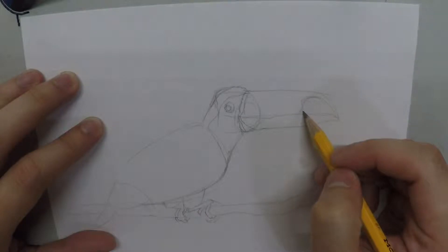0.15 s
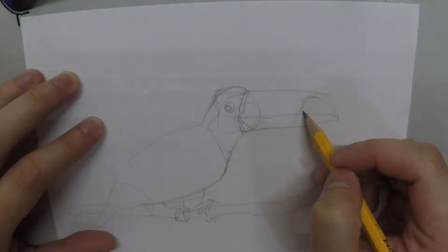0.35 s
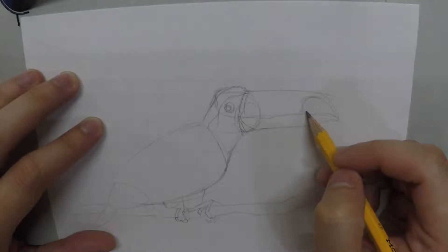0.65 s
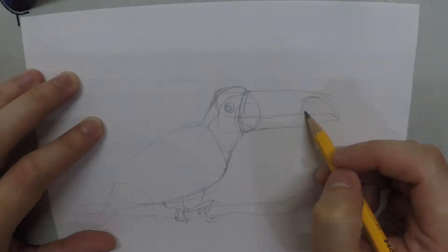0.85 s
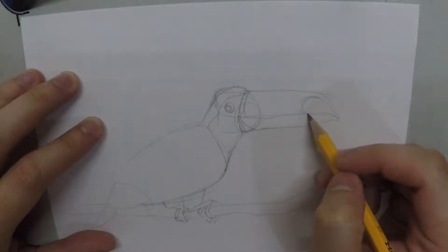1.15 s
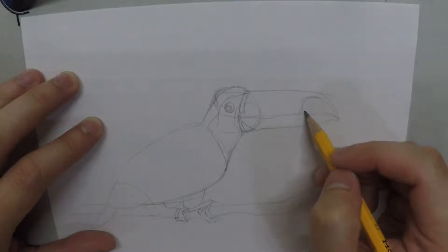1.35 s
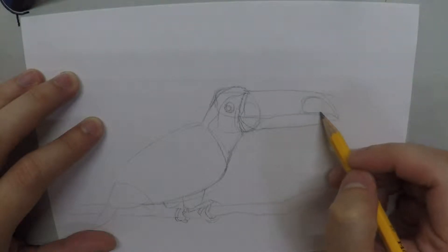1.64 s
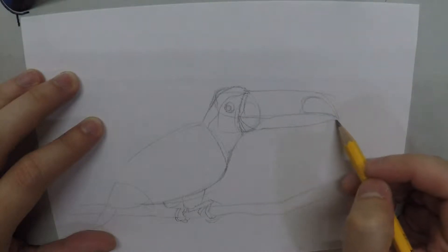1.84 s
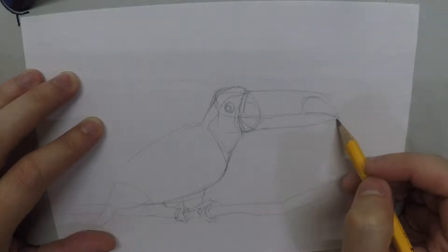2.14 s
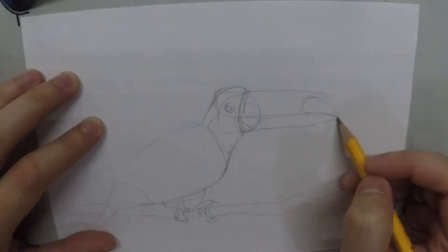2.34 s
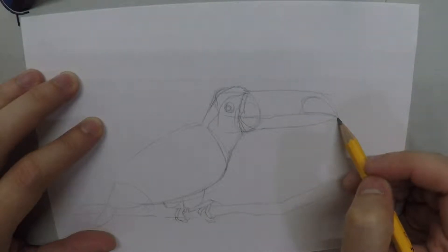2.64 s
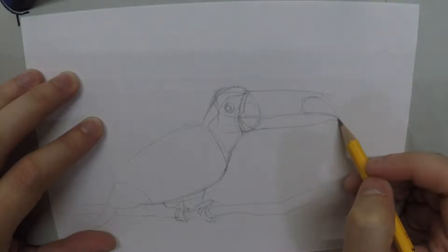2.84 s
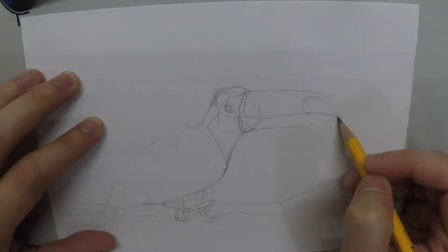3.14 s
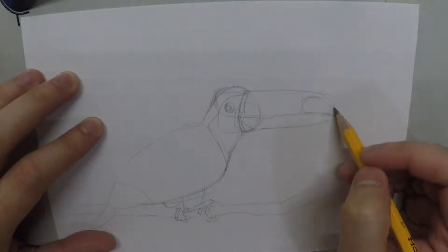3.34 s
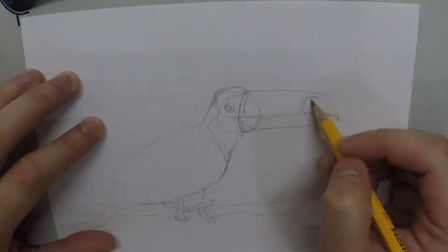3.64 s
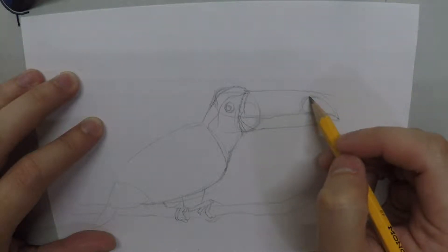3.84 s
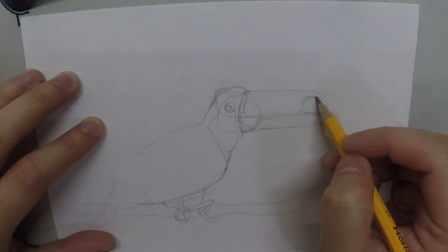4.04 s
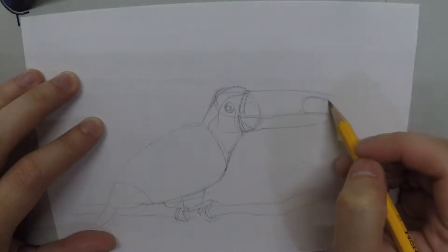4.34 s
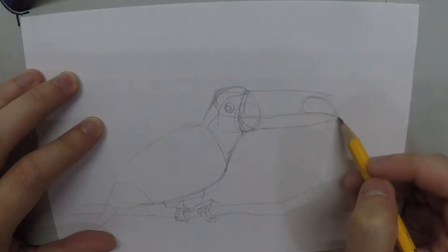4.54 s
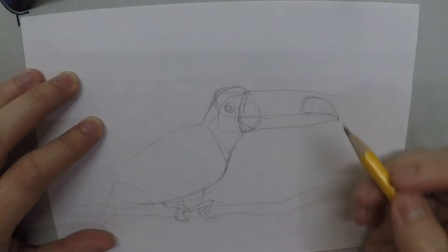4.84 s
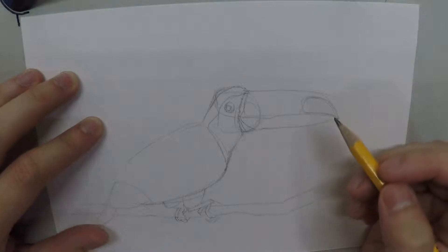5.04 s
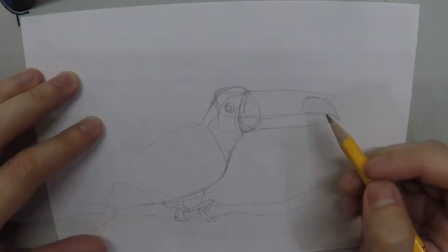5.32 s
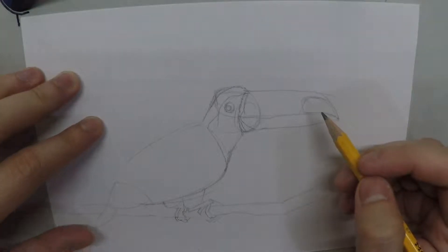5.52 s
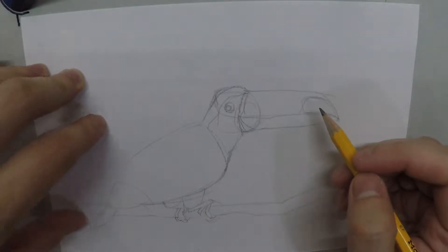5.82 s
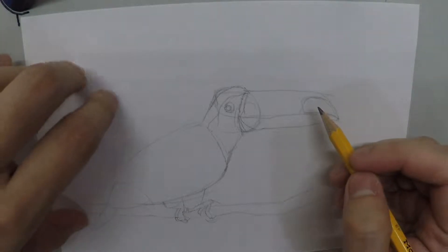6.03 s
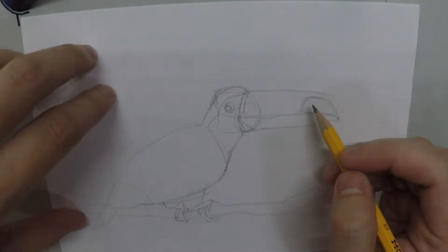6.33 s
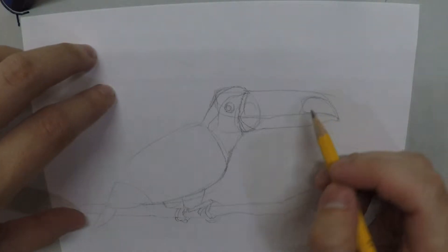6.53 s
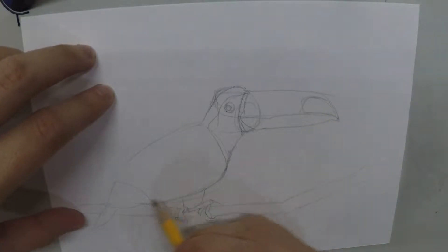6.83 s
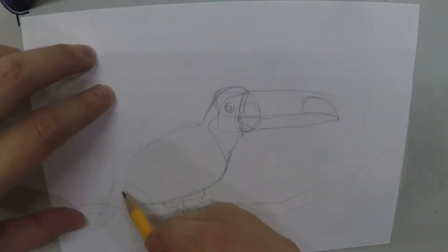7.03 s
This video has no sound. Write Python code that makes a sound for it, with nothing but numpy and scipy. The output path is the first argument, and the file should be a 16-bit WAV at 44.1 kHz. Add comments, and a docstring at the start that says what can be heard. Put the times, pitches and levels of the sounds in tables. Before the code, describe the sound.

A close microphone at a desk in a small, quiet room, with faint hiss and low rumble. From 0 to 1.4 s there is almost nothing, just tiny skin grazes on paper. A soft hand slide begins at 1.4 s, and a lighter pencil stroke starts at 1.5 s. Until about 3.85 s, short dry scratches follow, spaced roughly 0.15 to 0.3 s, bright and gritty, strongest from 2.2 s; a few carry a thin high squeak, notably at 2.2 and 2.6 s. A pause holds a faint hand slide near 4.2 s. Four more crisp strokes come at 4.6, 4.7, 4.9 and 5.2 s. Deep soft double thump of the hand on the desk at 4.9 s, another thump at 5.3 s, both with a short low ring. Afterwards only barely audible pencil touches around 5.5 to 5.8 s, light fingertip taps near 6 s, a very faint bump at 6.55 s, and a slight skin graze at 6.9 s.

```python
"""Pencil sketching at a desk

A pencil makes quick strokes on paper lying on a desk in a small quiet room: slip noise rings pencil and sheet.
At each stroke's top speed a short tone with unsteady pitch makes a squeak, mostly weaker than the scratch.
The drawing hand thumps softly on ringing desk modes and slides over the sheet as filtered friction noise.
Skin grazes and fingertip taps ring the paper; a low rumble, a faint noise floor and room echoes surround it."""
import sys
import numpy as np
from scipy import signal
from scipy.fft import rfft, irfft
from scipy.io import wavfile

SR = 44100
rng = np.random.default_rng(int(sys.argv[2]) if len(sys.argv) > 2 else 0)


def file_out(sig):
    """Save sig as 16-bit WAV at sys.argv[1]."""
    # one column per channel
    cols = np.atleast_2d(sig).T
    # limit, then scale
    lim = np.clip(cols, -1, 1)
    pcm = np.round(lim * 32767).astype(np.int16)
    wavfile.write(sys.argv[1], SR, pcm)


N = 316446
TIME = np.arange(N) / SR


def from_db(db):
    """Decibels to amplitude gain."""
    return 10 ** (np.asarray(db) / 20)


def rms_one(x):
    """Scale to rms 1."""
    return x / np.sqrt(np.mean(x ** 2) + 1e-20)


def at_hz(points, hz):
    """Read a table on a log-frequency axis."""
    f, value = np.transpose(points)
    return np.interp(np.log(np.maximum(hz, 1)), np.log(f), value)


def add(track, start_s, sound):
    """Mix a sound into the track from start_s, cut at the track's end."""
    i = round(start_s * SR)
    track[i:i + len(sound)] += sound[:N - i]


def band(x, low_hz, high_hz):
    """Butterworth band-pass."""
    edges = [low_hz, min(high_hz, .45 * SR)]
    return signal.sosfilt(signal.butter(2, edges, "band", fs=SR, output="sos"), x)


def resonate(x, hz, width_hz):
    """A resonance passed twice, so that its skirts are steep; width_hz is that of one pass."""
    r = np.exp(-np.pi * width_hz / SR)  # pole radius
    section = [(1 - r * r) / 2, 0, -(1 - r * r) / 2, 1, -2 * r * np.cos(2 * np.pi * hz / SR), r * r]
    return signal.sosfilt([section, section], x + 1e-18)


def rub(force, hz, width_hz):
    """Friction noise under a force rings one resonance; a steady force of 1 gives about rms 1."""
    noise = force * rng.standard_normal(len(force))
    return resonate(noise, hz, width_hz) * np.sqrt(2 * SR / (np.pi * width_hz))


def wobble(size, rate_hz):
    """Random points at rate_hz joined by straight lines, rms 1."""
    return rms_one(np.interp(np.arange(size) * rate_hz / SR, np.arange(size), rng.standard_normal(size)))


def coloured_noise(spectrum):
    """Steady noise of a given colour, rms 1."""
    gain = from_db(at_hz(spectrum, np.arange(N // 2 + 1) * SR / N))
    return rms_one(irfft(rfft(rng.standard_normal(N)) * gain, N))


# colour of the noise floor, relative density: hz, density_db (per Hz)
QUIET_COLOUR = [(26, -28.5), (45, -7.5), (77, -2), (98, -15), (131, -11), (218, -24.5), (307, -25.5),
                (411, -27), (873, -32), (1090, -29), (1450, -33.5), (2940, -32), (3750, -31.5), (4040, -34),
                (15000, -45.5)]


def background(level_db=-62.5):
    """Room tone and microphone hiss, levelled by its rms from 200 to 15000 Hz."""
    lowest_point = (20, QUIET_COLOUR[0][1] - 10)
    noise = coloured_noise([lowest_point] + list(QUIET_COLOUR))
    return from_db(level_db) * noise / np.std(band(noise, 200, 15000))


# the resting hands stir the desk, before the trim: time_s, level_db
RUMBLE_LEVEL = [(0, -53.5), (.8, -54), (1.05, -48), (1.5, -50.5), (2.5, -47), (3.2, -46.5), (3.75, -58.5),
                (4.17, -43), (4.4, -52), (4.8, -42), (5.8, -39.5), (6.15, -36.5), (6.35, -44), (6.6, -39),
                (7.18, -47.5)]
# colour of that rumble, relative: hz, level_db
RUMBLE_COLOUR = [(15, -30.5), (24, -9.5), (29, 2.5), (36, -19), (48, -29.5), (70, -12.5), (95, -29),
                 (130, -33), (220, -50), (500, -82)]


def rumble(trim_db=-1):
    """Small movements of the hands keep the desk trembling: low noise with a drifting level."""
    time_s, level_db = np.transpose(RUMBLE_LEVEL)
    return from_db(trim_db + np.interp(TIME, time_s, level_db)) * coloured_noise(RUMBLE_COLOUR)


# skin grazes the paper: start_s, length_s, level_db, rustle_hz
GRAZES = [(0.184, 0.15, -70.5, 3830), (0.827, 0.091, -66.5, 3750), (0.995, 0.23, -72, 3600),
          (1.368, 0.18, -63.5, 3680), (6.872, 0.19, -68, 3420)]


def grazes(grain_db=3, grain_hz=144.5, hiss_db=-10):
    """Light sliding friction with a grainy force: a narrow rustle and a little hiss."""
    out, t = np.zeros(N), TIME[:SR // 3]
    for start_s, length_s, level_db, rustle_hz in GRAZES:
        arch = np.sqrt(np.abs(np.sin(np.pi * np.minimum(t / length_s, 1))))
        force = arch * from_db(grain_db * wobble(len(t), grain_hz))
        rustle = rub(force, rustle_hz, 370)
        hiss = from_db(hiss_db) * rub(force, 6100, 3700)
        add(out, start_s, from_db(level_db) * (rustle + hiss))
    return out


# the edge of the drawing hand slides over the sheet: start_s, length_s, level_db
SLIDES = [(1.428, 0.36, -64), (3.131, 0.22, -68), (4.179, .32, -67)]
# resonances of the sheet held down by the hand: hz, width_hz, level_db
HELD_SHEET = [(585, 110, -6.5), (1100, 130, -2), (1710, 120, -8.5)]


def slides():
    """The hand moves to a new place; friction on the held sheet gives a soft, hollow rub."""
    out, t = np.zeros(N), TIME[:SR // 2]
    for start_s, length_s, level_db in SLIDES:
        force = np.sqrt(np.abs(np.sin(np.pi * np.minimum(t / length_s, 1))))
        hollow = sum(from_db(db) * rub(force, hz, width_hz) for hz, width_hz, db in HELD_SHEET)
        add(out, start_s, from_db(level_db) * hollow)
    return out


SWELL_SHARE = .6  # the lead reaches top speed this far into a stroke
# resonances of pencil and sheet, relative levels: hz, width_hz, level_db
PENCIL_MODES = [ (1120, 180, -44.5), (1358, 71, -40.5), (1720, 140, -34), (2143, 150, -30.5),
                (2441, 140, -14.5), (2640, 54, -22), (2930, 160, -22.5), (3207, 190, -10.5),
                (3380, 51, -17), (3595, 140, -7), (3710, 59, -7), (3846, 130, -4), (4233, 180, -13.5),
                (4572, 220, -4.5), (4650, 160, -16), (5268, 145, 0.5), (5547, 110, -0.5), (5700, 210, -4),
                (6190, 540, 6), (6338, 340, 6), (6540, 239, -3.5), (6970, 410, -4.5), (7540, 170, -5.5),
                (7874, 220, -7), (8510, 910, -14), (9620, 600, -22), (10315, 620, -24.5), (11900, 800, -37),
                (13200, 880, -37)]
# pencil strokes, length up to half lifted, squeak relative to the scratch level:
# start_s, length_s, level_db, brightness_db, squeak_hz, squeak_db
STROKES = [ (1.526, 0.07, -30.5, -4, 4380, -7), (1.632, 0.057, -24, 0, 3625, -7.5),
           (1.954, 0.085, -22.5, -2, 3760, -8), (2.221, 0.082, -17.5, 1.5, 6350, 3),
           (2.412, .076, -18, -0.5, 3780, -8), (2.617, 0.066, -23.5, -.5, 6530, 2.5),
           (2.806, 0.061, -19, -1.5, 6360, -2.5), (2.978, 0.057, -19, -.5, 6470, -11.5),
           (3.139, 0.056, -17.5, -1, 6300, -3.5), (3.29, .073, -19.5, -0.5, 3840, -12.5),
           (3.445, .071, -19.5, -3, 4500, -12), (3.604, 0.071, -19.5, -2.5, 3765, -16.5),
           (3.789, 0.073, -18, -0.5, 3860, -12.5), (4.607, .055, -21.5, -1, 3730, -3.5),
           (4.704, 0.058, -20.5, -0.5, 3643, -7), (4.934, 0.052, -19.5, -0.5, 3410, -9),
           (5.186, .059, -19, 0, 6370, -16), (5.538, 0.062, -65.5, -2, 3330, 7),
           (5.718, 0.027, -49, -9, 3300, -6.5), (5.731, 0.039, -59, -7, 3650, -2.5),
           (5.768, 0.042, -61.5, -6, 3300, 7), (5.813, .06, -59.5, -8, 5720, -1.5)]


def pencil(tooth_db=2.6, tooth_hz=1100, ease_db=-3, lift_s=0.023, swell_shape=1.58, speed_colour=0.69,
           bright_hz=4900, firm_db=-22.5, drum_db_per_db=0.24, drum_hz=2850, vary_db=2.1, detune=0.0062):
    """The lead speeds up, catches on the tooth of the paper in uneven slips, and lifts off."""
    out, t = np.zeros(N), TIME[:SR // 6]
    hz, width_hz, mode_db = np.transpose(PENCIL_MODES)
    for start_s, length_s, level_db, brightness_db, _, _ in STROKES:
        swell_s = SWELL_SHARE * length_s
        speed = np.sin(np.pi / 2 * np.minimum(t / swell_s, 1))
        ease = from_db(ease_db * np.maximum(t - swell_s, 0) / swell_s)
        contact = ease / (1 + np.exp(4 * (t - length_s) / lift_s))
        force = contact * rms_one(from_db(tooth_db * wobble(len(t), tooth_hz)))
        # the angle of the lead tips the balance of low and high modes
        tilt_db = brightness_db * np.tanh(6 * np.log(hz / bright_hz))
        # the lighter the stroke, the looser the sheet lies and the more it drums
        drum_db = drum_db_per_db * (firm_db - level_db) * (hz < drum_hz)
        gains = from_db(mode_db + tilt_db + drum_db + vary_db * rng.standard_normal(len(hz)))
        gains /= np.linalg.norm(gains)
        pitches = hz * (1 + detune * rng.standard_normal(len(hz)))
        # high modes need more speed to wake
        wake = swell_shape * (hz / bright_hz) ** speed_colour
        scratch = np.zeros(len(t))
        for gain, power, pitch_hz, w in zip(gains, wake, pitches, width_hz):
            scratch += gain * rub(force * speed ** power, pitch_hz, w)
        add(out, start_s, from_db(level_db) * scratch)
    return out


def squeaks(cycles=135, edge_s=.003, burst_hz=420, burst_db=2.0, pitch_spread=.035, pitch_rate_hz=1200):
    """Around top speed the slips lock to one resonance, in bursts of a few milliseconds with unsteady pitch."""
    out, t = np.zeros(N), TIME[:SR // 12]
    for start_s, length_s, level_db, _, squeak_hz, squeak_db in STROKES:
        lasts_s = cycles / squeak_hz
        edges = np.clip(np.minimum(t, lasts_s - t) / edge_s, 0, 1)
        grip = edges * rms_one(from_db(burst_db * wobble(len(t), burst_hz)))
        pitch_hz = squeak_hz * (1 + pitch_spread * wobble(len(t), pitch_rate_hz))
        tone = rms_one(np.sin(2 * np.pi * np.cumsum(pitch_hz) / SR))
        # centred on the moment of top speed
        squeak_start_s = start_s + SWELL_SHARE * length_s - lasts_s / 2
        add(out, squeak_start_s, from_db(level_db + squeak_db) * grip * tone)
    return out


# the hand lands on the desk; weight_db raises or lowers the modes under 40 Hz:
# start_s, level_db, contact_s, weight_db
THUMPS = [(2.433, -33, 0.0051, -11), (4.863, -17, 0.0094, -0.5), (4.893, -14, 0.014, -3),
          (5.309, -17, 0.012, -14), (6.558, -43, 0.0075, 4.5)]
# desk modes, levels before the weight: hz, level_db, t60_s
DESK_MODES = [(27.4, 1, 0.98), (31, -3.5, 0.96), (57.6, -15, 0.91), (71.9, -7, 0.33), (129, -6, 0.23),
              (198, -14, 0.43)]


def thumps(pat_db=-27, pat_s=0.015):
    """The soft edge of the hand knocks the desk; its weight sets the two lowest modes, which beat as they die."""
    out, t = np.zeros(N), TIME[:3 * SR // 2]
    for start_s, level_db, contact_s, weight_db in THUMPS:
        ring = np.zeros(len(t))
        for hz, mode_db, t60_s in DESK_MODES:
            fading_db = mode_db + weight_db * (hz < 40) - 60 * t / t60_s
            ring += from_db(fading_db) * np.cos(2 * np.pi * hz * t)
        # a longer contact softens the knock
        push = np.sin(np.pi * np.minimum(t / contact_s, 1)) ** 2
        knock = signal.fftconvolve(push / push.sum(), ring)[:len(t)]
        pat = from_db(pat_db) * rub(np.exp(-t / pat_s), 120, 80)
        add(out, start_s, from_db(level_db) * (knock + pat))
    return out


# fingertips tap the sheet: start_s, level_db
TAPS = [(4.867, -63), (4.91, -72), (5.298, -63), (5.948, -59.5), (6.069, -52), (6.555, -64.5)]
# resonances of the tapped sheet: hz, width_hz, level_db
SHEET_MODES = [(188, 99, 0), (370, 114, -2.5), (590, 130, -1.5), (1060, 130, 1), (1827, 370, -3.5),
               (2090, 670, -5), (2770, 670, -5.5)]


def taps(rise_s=0.0048):
    """A fingertip presses the sheet flat: a short force pulse of noise makes a brief soft crackle."""
    out, t = np.zeros(N), TIME[:SR // 8]
    force = t / rise_s * np.exp(1 - t / rise_s)
    for start_s, level_db in TAPS:
        crackle = sum(from_db(db) * rub(force, hz, width_hz) for hz, width_hz, db in SHEET_MODES)
        add(out, start_s, from_db(level_db) * crackle)
    return out


# reflections off nearby surfaces: delay_s, level_db
ECHOES = [(.00383, -14), (.00488, -16)]
# the room's diffuse tail: hz, t60_s, level_db
ROOM_TAIL = [(200, .25, -10), (990, .25, -7), (2400, 0.27, -5), (3710, 0.34, -8), (6240, 0.28, -17),
             (9910, 0.23, -4.5)]


def room(x, first_s=0.0039):
    """What comes back: two close echoes, and a diffuse tail that builds over first_s and dies band by band."""
    t, edges_hz = TIME[:SR * 2 // 3], np.geomspace(200, 16000, num=13)
    table, response = np.array(ROOM_TAIL), np.zeros(len(t))
    for low_hz, high_hz in zip(edges_hz, edges_hz[1:]):
        centre_hz = np.sqrt(low_hz * high_hz)
        t60_s = at_hz(table[:, :2], centre_hz)
        level_db = at_hz(table[:, ::2], centre_hz)
        decay = from_db(-60 * t / t60_s) * np.minimum(t / first_s, 1) ** 2
        decay /= np.linalg.norm(decay)
        response += from_db(level_db) * band(rng.standard_normal(len(t)), low_hz, high_hz) * decay
    for delay_s, level_db in ECHOES:
        add(response, delay_s, from_db([level_db]))
    return signal.fftconvolve(x, response)[:N]


def scene(squeak_room_db=-5, top_hz=12000):
    """The broad sheet fills the room more than the singing tip does; the desk shakes the microphone directly."""
    paper = band(pencil() + grazes() + slides() + taps(), 150, top_hz)
    tip = squeaks()
    reflected = room(paper + from_db(squeak_room_db) * tip)
    desk = thumps() + rumble()
    return (paper + tip + reflected + desk + background())[None]


def record(dry, cutoff_hz=15000):
    """A steep elliptic low-pass cuts the top."""
    return signal.sosfilt(signal.ellip(12, .1, 80, cutoff_hz, fs=SR, output="sos"), dry)


dry = scene()
out = record(dry)
file_out(out)
```